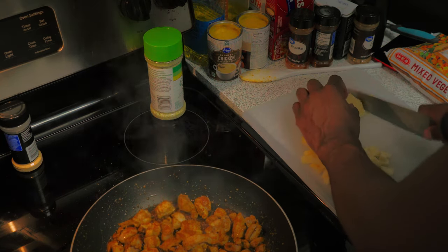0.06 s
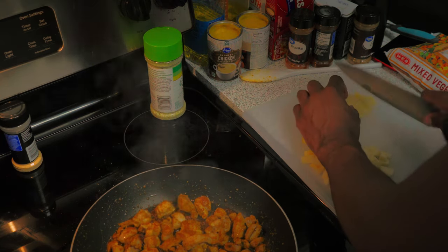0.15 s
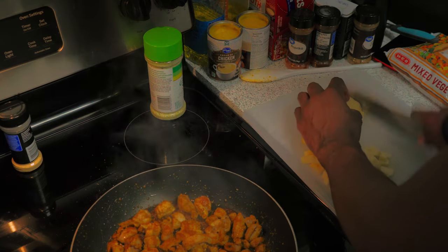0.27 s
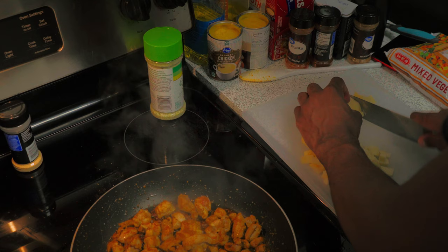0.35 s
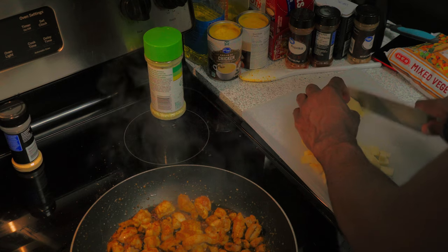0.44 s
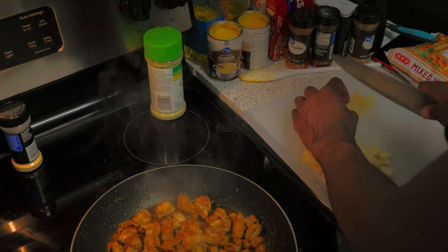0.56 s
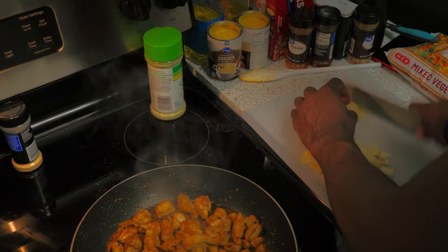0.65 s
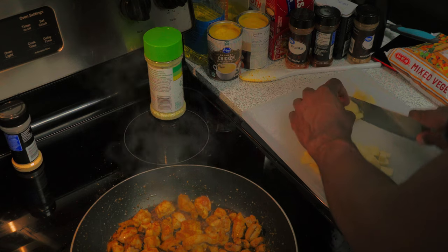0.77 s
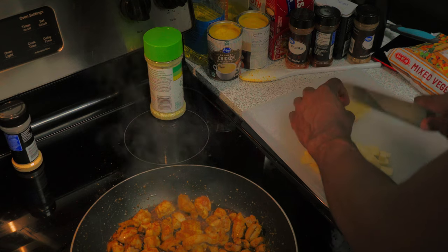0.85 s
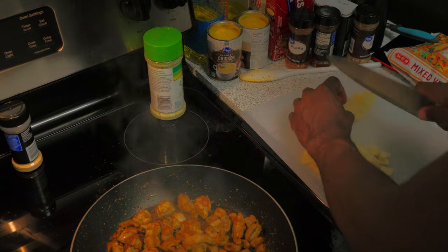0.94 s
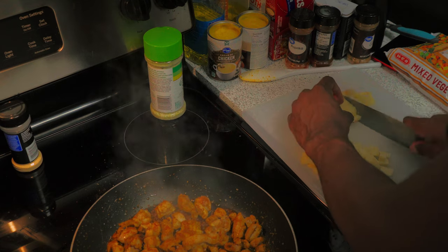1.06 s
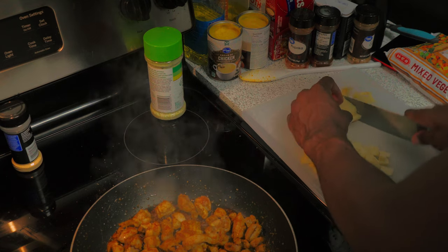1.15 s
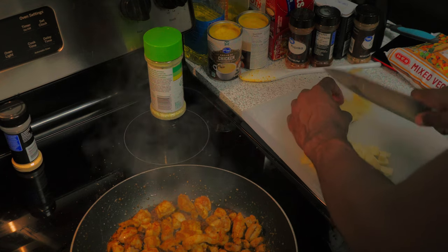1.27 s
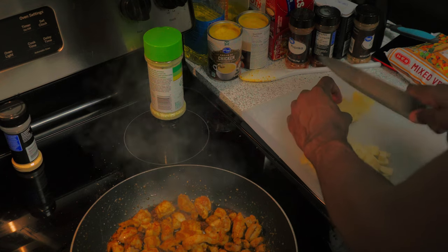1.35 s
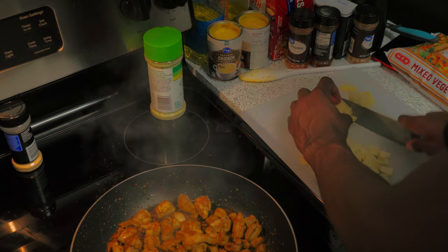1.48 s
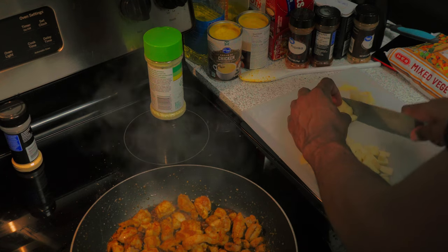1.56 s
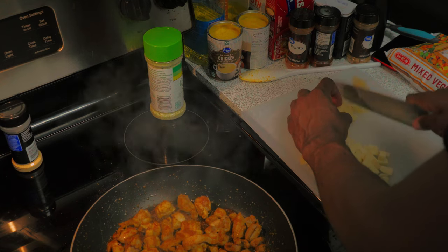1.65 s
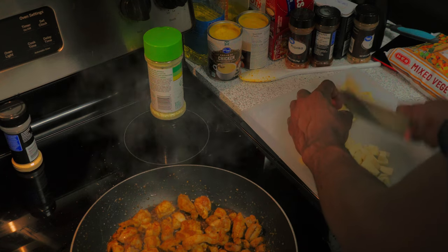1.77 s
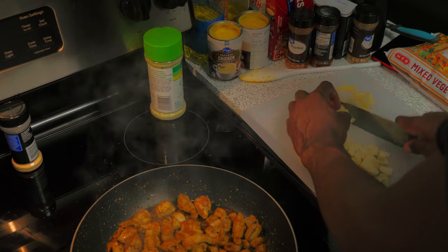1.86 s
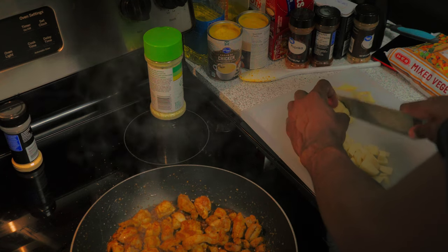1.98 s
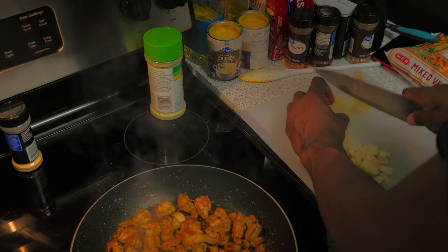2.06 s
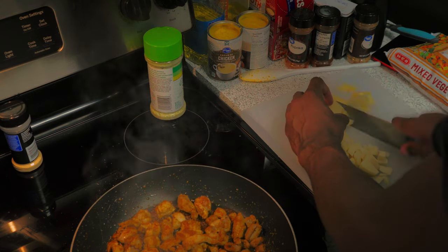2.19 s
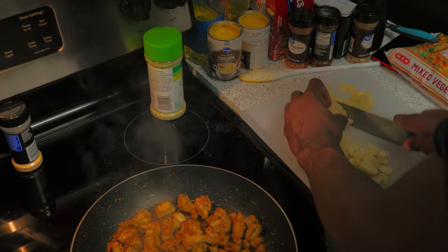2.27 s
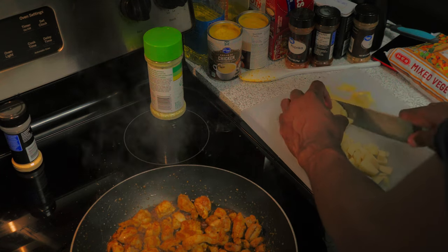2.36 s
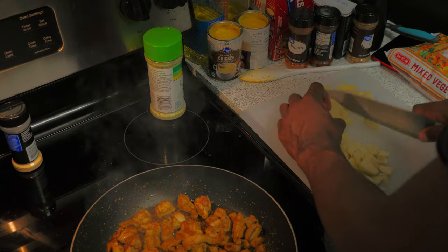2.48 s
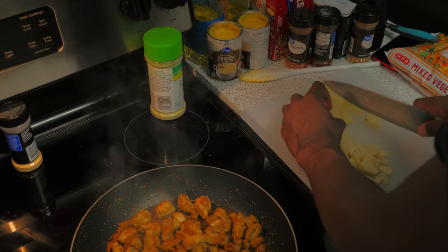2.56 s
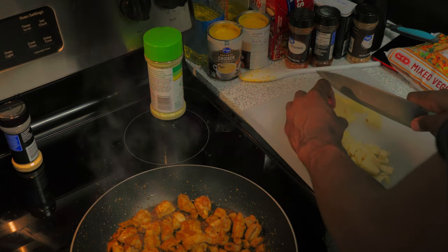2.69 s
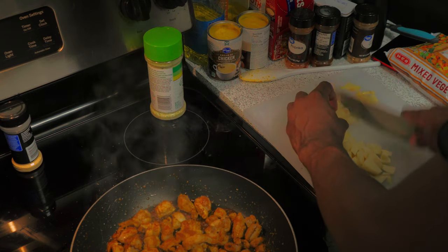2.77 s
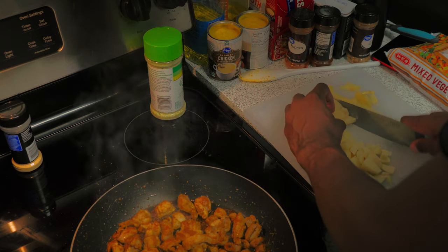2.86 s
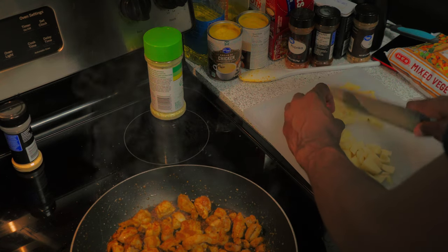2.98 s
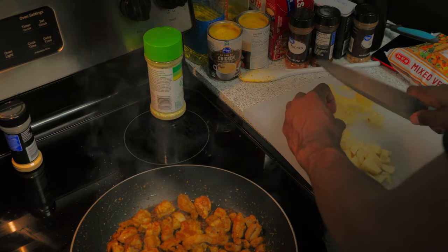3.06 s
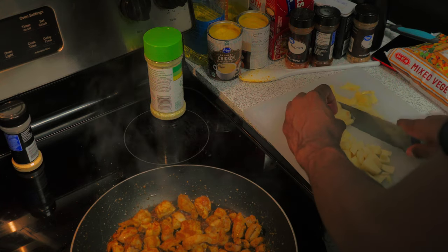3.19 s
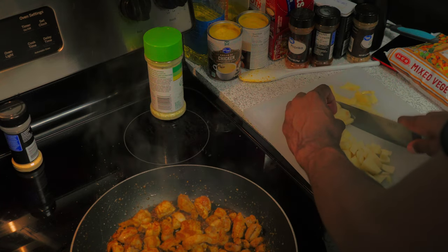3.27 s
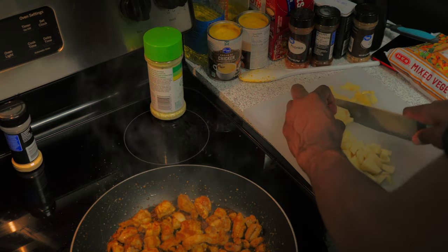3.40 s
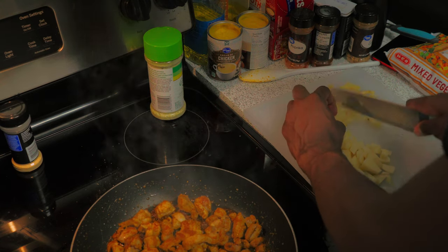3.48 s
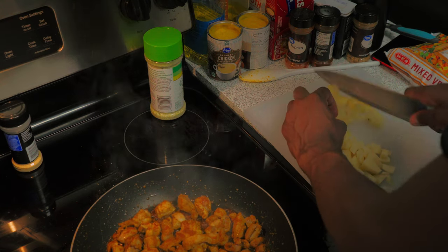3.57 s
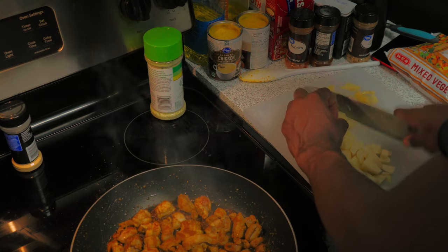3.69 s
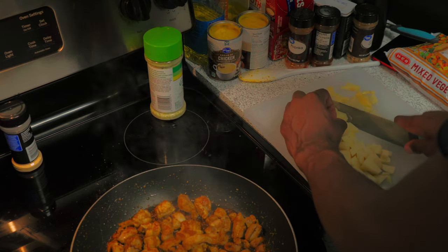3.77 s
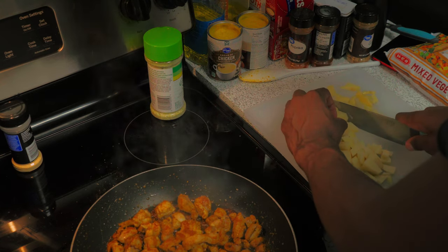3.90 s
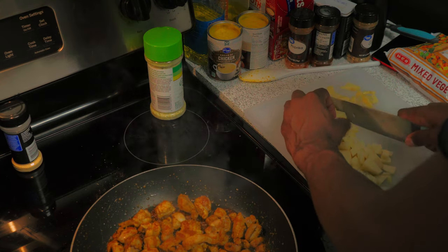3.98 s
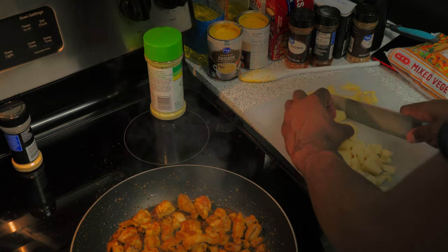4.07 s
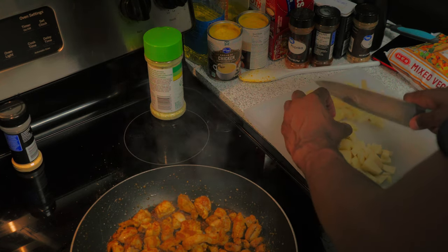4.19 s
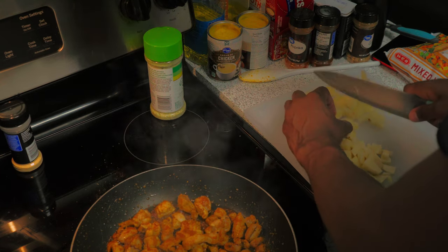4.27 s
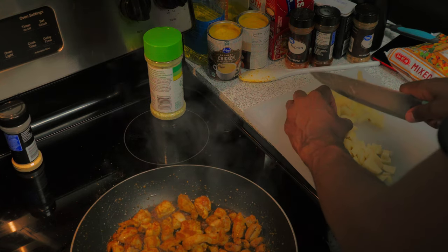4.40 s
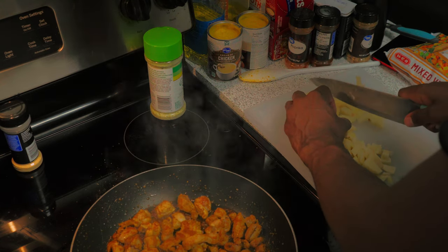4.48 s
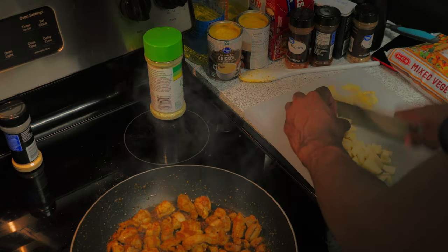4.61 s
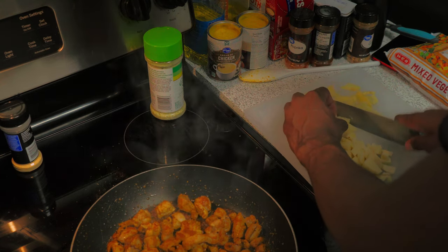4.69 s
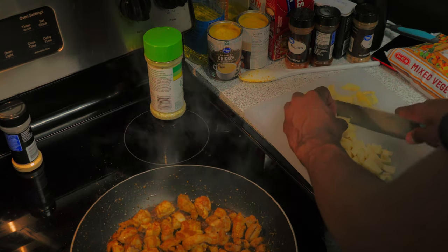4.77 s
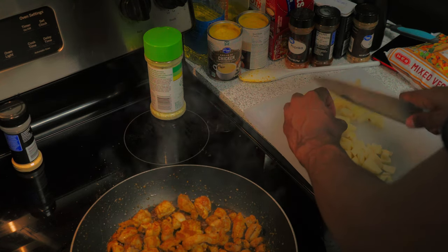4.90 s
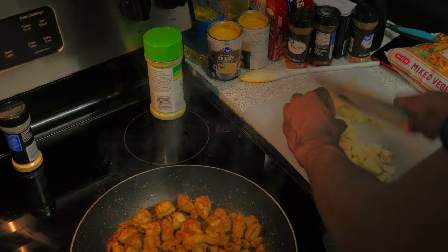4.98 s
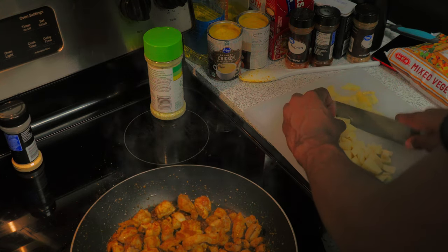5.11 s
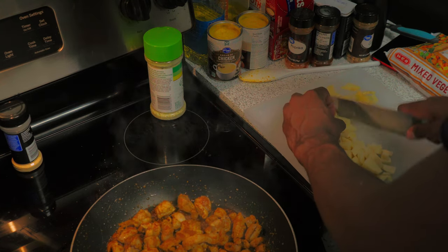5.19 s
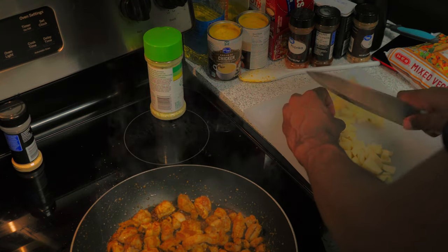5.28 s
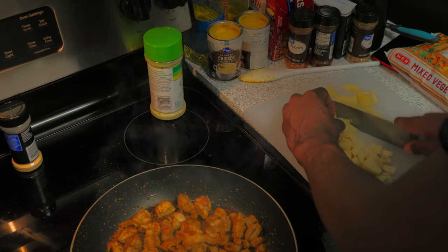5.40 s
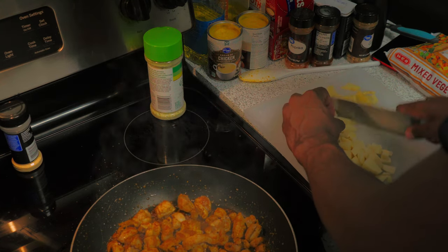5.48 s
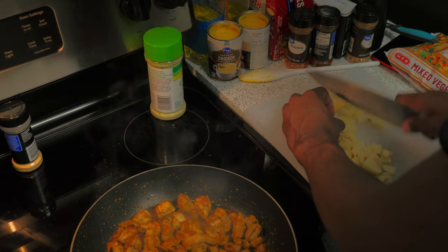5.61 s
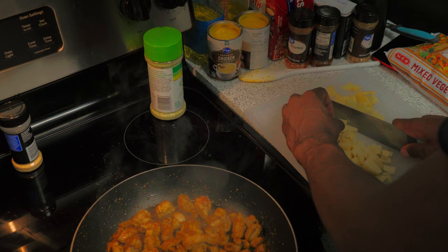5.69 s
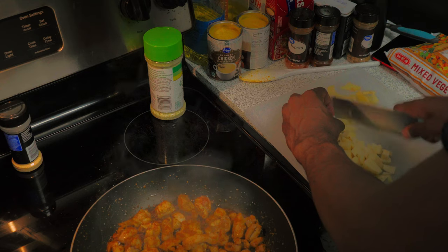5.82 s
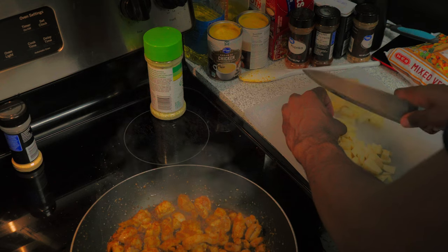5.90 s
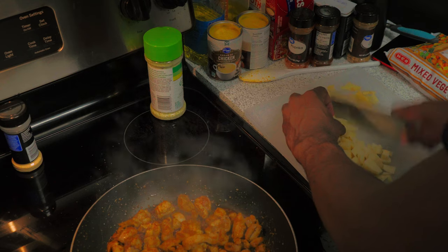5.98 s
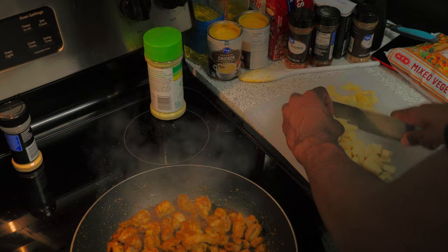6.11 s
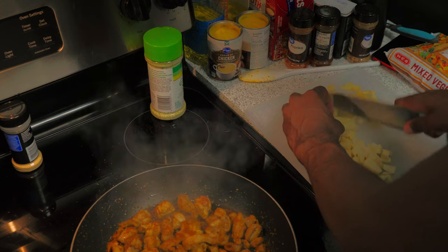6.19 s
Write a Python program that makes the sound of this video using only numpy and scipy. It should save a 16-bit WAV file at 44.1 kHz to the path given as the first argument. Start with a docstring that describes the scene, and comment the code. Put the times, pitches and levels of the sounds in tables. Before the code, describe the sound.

Close knife strokes crunch through potato and knock on a cutting board, over faint frying and a low appliance hum.

```python
"""A small, hard-walled kitchen, one microphone close to a plastic cutting board. A pan sizzles and an
appliance hums throughout. We come in on the ring of a hard chop; a chef's knife goes on through a potato,
each stroke a wet crunch, a sharp knock on the board, then the room's ring. Hard knocks clip, and the
limiter ducks and lets the room swell back. The pace slackens, and the steel clicks near 2.9 s. At 5.7 s
a stroke glances off with a scrape and a thump; one firm chop follows."""
import sys
import numpy as np
from scipy import signal
from scipy.fft import rfft, irfft, next_fast_len
from scipy.io import wavfile
from scipy.ndimage import uniform_filter1d, map_coordinates

SR = 44100
rng = np.random.default_rng(int(sys.argv[2]) if len(sys.argv) > 2 else 0)


def wrap_up_sound(samples):
    """Save the sound to the file named by the first command line argument, as 16-bit audio."""
    columns = np.atleast_2d(samples).T
    # keep every value between -1 and 1, then stretch to whole-number steps
    tamed = np.clip(columns, -1, 1)
    steps = np.round(tamed * 32767).astype(np.int16)
    wavfile.write(sys.argv[1], SR, steps)


N = 275625
T = np.arange(int(.8 * SR)) / SR  # seconds within one event


def amp(db):
    """Decibels to gain."""
    return 10 ** (np.asarray(db) / 20)


def unit(x):
    """x at rms 1."""
    return x / np.sqrt(np.mean(x ** 2) + 1e-20)


def along(points, hz):
    """(Hz, value) points read on a log frequency axis."""
    freqs, values = np.transpose(points)
    return np.interp(np.log(hz + 1), np.log(freqs), values)


def add(track, s, sound):
    """Mix a sound into the track at s seconds."""
    start = round(s * SR)
    part = sound[max(0, -start):max(0, N - start)]
    track[max(0, start):][:len(part)] += part


def noise(spectrum, size):
    """Noise of rms 1, shaped by (Hz, dB) points."""
    m = next_fast_len(size)
    gains = amp(along(spectrum, np.fft.rfftfreq(m, 1 / SR)))
    return unit(irfft(rfft(rng.standard_normal(m)) * gains, m)[:size])


def coloured(x, spectrum):
    """x through a minimum-phase filter with the given (Hz, dB) gains."""
    m = 2 * next_fast_len(len(x))
    cepstrum = irfft(np.log(amp(along(spectrum, np.fft.rfftfreq(m, 1 / SR)))), m)
    cepstrum[1:m // 2] *= 2
    cepstrum[m // 2 + 1:] = 0
    return irfft(rfft(x, m) * np.exp(rfft(cepstrum)), m)[:len(x)]


def wobble(rate):
    """A smooth random curve, rate knots a second."""
    knots = rng.standard_normal(int(N * rate / SR) + 4)
    return map_coordinates(knots, [np.arange(N) * rate / SR])


def fade(t60):
    """An exponential decay, 60 dB down after t60 seconds."""
    return np.exp(-np.log(1000) * T / t60)


def rise(attack):
    """A smooth onset with a time constant of attack seconds."""
    return 1 - np.exp(-T / attack)


def gate(length, attack, release):
    """Rise, hold until length seconds, die away."""
    return rise(attack) * np.exp(-np.maximum(T - length, 0) / release)


def ring(modes, scatter_db, loose=0):
    """Damped modes at new strengths on each strike; loose 0-1 scatters their phases."""
    out = np.zeros(len(T))
    for hz, db, t60 in modes:
        strength = amp(db + scatter_db * rng.standard_normal())
        out += strength * fade(t60) * np.sin(2 * np.pi * (hz * T + loose * rng.random()))
    return out


# The appliance's tones. Each row: frequency in Hz, level in dB.
HUM_TONES = [(118.4, -49), (242.2, -51), (479.1, -49.5), (511.4, -53), (742.9, -56)]
# The rumble under them. Each row: frequency in Hz, relative level in dB.
RUMBLE_SPECTRUM = [(15, 10.5), (27, 1), (42, -6), (80, -6), (120, -9), (160, -2), (240, 4.5), (350, -4.5),
                   (500, -4.5), (800, -18), (2500, -34)]
def appliance(rumble_db, tone_trim_db):
    """Far in the background, an appliance hums a little unsteadily over a soft rumble."""
    t = np.arange(N) / SR
    hum = np.zeros(N)
    for hz, db in HUM_TONES:
        level = amp(db + tone_trim_db + 3.1 * wobble(7.5))
        hum += level * np.sin(2 * np.pi * hz * t + wobble(4.8))
    return hum + amp(rumble_db) * noise(RUMBLE_SPECTRUM, N)


# Steam leaving the food. Each row: frequency in Hz, relative level in dB.
STEAM_SPECTRUM = [(200, -53), (800, 4), (2000, 5), (3500, 3.5), (5500, 4.5), (8000, -1.5), (12000, -5),
                  (16000, -9.5)]
def pan(hiss_db, crackle_db, pops_per_second, spread_db):
    """In the pan alongside, steam hisses and countless small bubbles burst in the fat."""
    hiss = amp(hiss_db + 0.35 * wobble(4.55)) * noise(STEAM_SPECTRUM, N)
    draws = rng.random((int(pops_per_second * N / SR), 3))
    when, pitch, faintness = draws.T[:, :, None]
    pop_samples = np.arange(128)
    cycles = 4500 * 3.3 ** pitch * pop_samples / SR
    strength = amp(-spread_db * np.log(faintness + 0.026))  # many faint, a few strong
    pops = strength * np.sin(2 * np.pi * cycles) * np.exp(-cycles / 2)
    positions = (when * N).astype(int) + pop_samples
    crackle = np.bincount(positions.ravel(), pops.ravel(), N)[:N]
    return hiss + amp(crackle_db) * unit(crackle)


def ticks(rows, t60, skirt_db):
    """Tiny bright snaps, each a noise burst around its own pitch."""
    out = np.zeros(N)
    for s, peak_db, hz in rows:
        band = [(hz / 4, 2 * skirt_db), (hz / 1.7, skirt_db), (hz, 0), (hz * 1.47, skirt_db)]
        burst = fade(t60) * noise(band, len(T))
        add(out, s, amp(peak_db) * burst / np.abs(burst).max())
    return out


# The loudest spits of fat. Each row: start in seconds, peak in dB, pitch in Hz.
LOUD_SPITS = [(.2605, -18.5, 7000), (.594, -18.5, 5000), (4.211, -27, 6200), (4.9052, -23, 5500),
              (4.9776, -25, 5900), (5.2115, -26, 5100), (5.71, -18, 4940)]
def spits(small_count, small_db, spread_db, small_hz):
    """Fat spits in the pan: a few loud snaps among small ones at random moments."""
    small = [(when * N / SR, small_db + spread_db * (2 * size - 1), small_hz * 2 ** (pitch - .5))
             for when, size, pitch in rng.random((small_count, 3))]
    return ticks(list(LOUD_SPITS) + small, t60=0.015, skirt_db=-16)


# What the hard walls send back. Each row: frequency in Hz, relative level in dB.
ROOM_SPECTRUM = [(30, -34), (60, -14), (100, 13.5), (145, -1.5), (230, 8), (480, -1), (720, -0.5),
                 (930, -1), (1300, -1.5), (2200, -5), (3600, -8.5), (6300, -17.5), (9500, -30.5),
                 (16000, -45)]
# How long the room holds it. Each row: frequency in Hz, t60 in seconds.
ROOM_T60 = [(80, 0.25), (300, 0.45), (1000, 0.65), (3000, 0.63), (7000, 0.72), (15000, 0.51)]
def room_tail(build_s):
    """The kitchen's diffuse answer: it builds up, then each frequency dies at its own speed."""
    hz, t, bands = signal.stft(noise(ROOM_SPECTRUM, len(T)), SR, nperseg=256)
    decay = amp(-60 * t / along(ROOM_T60, hz)[:, None])
    tail = signal.istft(bands * decay, SR)[1][:len(T)]
    return tail * rise(build_s)


# Modes of board, blade, and counter with kitchen. Each row: frequency in Hz, level in dB, t60 in seconds.
BOARD_MODES = [(230, -17.5, 0.068), (949, -1.5, 0.019), (1055, -3, 0.017), (1346, 0, 0.013)]
BLADE_MODES = [(2664, -8.5, 0.027), (3410, -15, 0.038)]
COUNTER_MODES = [(81, -3, .28), (103, 5, .28), (183, -3, .28), (226, 3, .3), (250, 4.5, .33), (488, -3, .4),
                 (631, -1, .44), (781, -3, .42), (836, -4, .42), (902, 4, .47), (928, 4.5, .5),
                 (976, -1, .48), (1055, 2.5, .48), (1138, -2, .48), (1351, -2.5, .45), (1492, -3.5, .45),
                 (1643, -7, .45), (1815, -7.5, .45), (2790, -7, .45)]
# The crack of steel on plastic. Each row: frequency in Hz, relative level in dB.
CRACK_SPECTRUM = [(40, -46), (300, -9), (1200, 6.5), (4000, -5), (7000, -13), (15000, -34)]
def blow(knock_db, clack_db, crack_db, room_db, counter_db):
    """Blade meets board: a short knock, clack and crack up close, then counter and room ring."""
    board = ring(BOARD_MODES, scatter_db=2)
    blade = amp(clack_db) * ring(BLADE_MODES, scatter_db=3)
    crack = amp(crack_db) * fade(0.029) * noise(CRACK_SPECTRUM, len(T))
    counter = amp(counter_db) * ring(COUNTER_MODES, scatter_db=0.6, loose=0.98) * rise(0.0057)
    room = amp(room_db) * room_tail(build_s=0.0064)
    wall_swell = amp(2.54 * np.exp(-((T - .04) / 0.033) ** 2))  # the first echoes arrive in a bunch
    return amp(knock_db) * (board + blade) + crack + wall_swell * (counter + room)


# The tone of a light touch. Each row: frequency in Hz, gain in dB.
TAP_GAINS = [(40, -7), (150, 7), (300, 2.5), (850, 2), (1100, 8), (1450, 1.5), (6000, 10)]
def tap():
    """A soft contact sounds the same board, with little crack."""
    touch = blow(knock_db=-3, clack_db=-6.5, crack_db=-18, room_db=-11.5, counter_db=-30)
    return coloured(touch, TAP_GAINS)


# The blade's early touches. Each row: start in seconds, force in dB.
EARLY_TAPS = [(.3436, -17.5), (.727, -20.5), (1.502, -17), (1.862, -18), (2.2459, -18), (2.8706, -9),
              (3.261, -13.5), (3.796, -22.5), (5.0843, -18.5), (6.07, -9.5)]
def taps():
    """The blade touches the board lightly just before it comes fully down."""
    out = np.zeros(N)
    for s, force_db in EARLY_TAPS:
        add(out, s, amp(force_db) * tap())
    return out


# The click of the steel. Each row: start in seconds, peak in dB, pitch in Hz.
EDGE_CLICKS = [(2.8703, -1, 6400)]
def edge_click():
    """The steel edge clicks once, close and bright."""
    return ticks(EDGE_CLICKS, t60=0.022, skirt_db=-21)


def bump(hz, t60, attack):
    """A few slow cycles of the whole board on the counter."""
    return fade(t60) * rise(attack) * np.sin(2 * np.pi * hz * T)


# What the dragging edge rings. Each row: frequency in Hz, level in dB, t60 in seconds.
SCRAPE_MODES = [(1070, -2, 0.011), (2910, -5.5, 0.0087), (3430, -7, 0.014), (4800, -11, 0.006)]
def drag(length_s, slips_per_second, fade_db_per_s, room_db):
    """The edge sticks and slips ever more lightly; each slip rings the board and the room."""
    slips = (rng.random(len(T)) < slips_per_second / SR) * rng.standard_normal(len(T))
    rub = unit(signal.fftconvolve(slips, ring(SCRAPE_MODES, scatter_db=5))[:len(T)])
    rub *= amp(-fade_db_per_s * T) * gate(length_s, attack=.003, release=.006)
    tail = room_tail(build_s=0.0055)
    room = signal.fftconvolve(rub, tail / np.linalg.norm(tail))[:len(T)]
    return rub + amp(room_db) * room


def glance(land_s, thump_s):
    """One stroke glances off: it lands softly, the edge drags, and the board thumps."""
    out = np.zeros(N)
    add(out, land_s, amp(-19) * tap())
    scrape = drag(length_s=0.133, slips_per_second=970, fade_db_per_s=74, room_db=-14)
    add(out, land_s, amp(-26.5) * scrape)
    add(out, thump_s, amp(-10.5) * bump(hz=127, t60=0.1, attack=0.0033))
    return out


# The potato's crunch and the blade's low push. Each row: frequency in Hz, relative level in dB.
CRUNCH_SPECTRUM = [(40, -50), (200, -17), (1000, 20.5), (3000, 9.5), (6500, 11), (12000, 6), (16000, 9)]
PUSH_SPECTRUM = [(30, -32), (60, -16), (90, 4), (190, 5), (400, -10), (1000, -7), (2500, -53), (8000, -70)]
def cut(force_db, cut_s, fullness, crunch_db, swell_db=5, grain_db=3):
    """Potato cells burst in a grainy hiss that grows as the blade sinks; its push shakes the board."""
    depth = np.minimum(T / cut_s, 1)
    flicker = unit(uniform_filter1d(rng.standard_normal(len(T)), size=40))
    grain = unit(amp(grain_db * flicker))
    crunch = amp(crunch_db + swell_db * (depth - 1.5)) * grain * noise(CRUNCH_SPECTRUM, len(T))
    push = amp(-28.5 + 0.47 * force_db) * noise(PUSH_SPECTRUM, len(T))
    # a hard bite into a full slice bumps the board on the counter
    bite = amp(-25 + 1.2 * force_db) * fullness * bump(hz=173, t60=0.093, attack=.003)
    return gate(cut_s + 0.0019, attack=0.0022, release=0.0017) * (crunch + push) + bite


def chop(force_db, fullness, ring_db, ring_hz, ring_width=0.22):
    """The knife hits the board: harder is brighter and leaner, and where it lands sets the ring."""
    thud_db = -1.75 - 0.38 * force_db  # the bass grows more slowly than the force
    snap_db = 7.5 - 8 * fullness  # potato under the edge cushions the snap
    bright_db = 1 + 0.64 * min(force_db, 0)  # soft blows lose treble
    bass = [(35, thud_db - 11), (90, thud_db), (250, thud_db), (400, 0)]
    board = [(ring_hz / (1 + ring_width), 0), (ring_hz, ring_db), (ring_hz * (1 + ring_width), 0)]
    edge = [(2200, 0), (2800, snap_db), (3800, snap_db + 1), (5500, bright_db)]
    knock = blow(knock_db=4, clack_db=snap_db, crack_db=3.5, room_db=-10.5, counter_db=-24.5)
    return amp(force_db) * coloured(knock, bass + board + edge)


# The knife strokes. Each row: landing time in seconds, force in dB, length of the cut before it in
# seconds, crunch level in dB, gain of the board's ring in dB, its pitch in Hz.
KNIFE_STROKES = [(-.035, 8, 0.02, -23, 8.5, 875), (.3632, 1.5, 0.021, -22, 8.5, 1020),
                 (0.7613, 1.5, 0.042, -27.5, 6.5, 1050), (1.1377, 2, 0.044, -23, 6.5, 1130),
                 (1.5084, -0.5, 0.039, -22.5, 3.5, 980), (1.8763, 1, 0.028, -21.5, 4.5, 864),
                 (2.258, 0, 0.028, -24, 1.5, 890), (2.8745, -2, 0.018, -15, -1, 940),
                 (3.2664, -0.5, .025, -24.5, 0.5, 1060), (3.8196, -2.5, .06, -27, 4, 1130),
                 (4.6947, -7, 0.014, -19.5, 1.5, 1000), (5.0924, -5.5, 0.011, -20.5, 4.5, 830),
                 (5.4208, -5.5, 0.012, -17, 3, 834), (6.0748, 2, 0.0075, -31, 4.5, 870)]
def strokes(full_cut_s):
    """Right at the microphone, each stroke cuts through the potato, then strikes the board."""
    out = np.zeros(N)
    for s, force_db, cut_s, crunch_db, ring_db, ring_hz in KNIFE_STROKES:
        fullness = min(cut_s / full_cut_s, 1)
        add(out, s - cut_s, cut(force_db, cut_s, fullness, crunch_db))
        add(out, s, chop(force_db, fullness, ring_db, ring_hz))
    return out


def scene():
    """Hum behind, pan alongside and knife in front, all at one microphone."""
    hum = appliance(rumble_db=-39.5, tone_trim_db=-0.5)
    frying = pan(hiss_db=-38.5, crackle_db=-48, pops_per_second=290, spread_db=3)
    frying += spits(small_count=16, small_db=-37, spread_db=7, small_hz=9000)
    knife = taps() + edge_click() + glance(land_s=5.724, thump_s=5.775) + strokes(full_cut_s=0.027)
    return (hum + frying + knife)[None]


def limiter(x, threshold_db, attack_s, release_db_per_s, start_db):
    """The gain drops just after each overload and creeps back; it begins start_db down."""
    over_db = np.maximum(20 * np.log10(np.abs(x) + 1e-9) - threshold_db, 0)
    ramp_db = release_db_per_s * np.arange(N) / SR
    held_db = np.maximum.accumulate(np.maximum(over_db + ramp_db, start_db), axis=-1) - ramp_db
    pole = np.exp(-1 / (attack_s * SR))
    duck_db = start_db + signal.lfilter([1 - pole], [1, -pole], held_db - start_db)
    return x * amp(-duck_db)


def record(dry):
    """The close knocks overload the recorder: it ducks and clips, then trims deep bass and top treble."""
    ducked = limiter(dry, threshold_db=4.5, attack_s=0.0011, release_db_per_s=175, start_db=12.5)
    clipped = np.clip(ducked, -1, 1)
    m = next_fast_len(N + SR // 2)
    hz = np.fft.rfftfreq(m, 1 / SR)
    passband = hz / np.hypot(hz, 30) * (hz < 15800)
    return irfft(rfft(clipped, m) * passband, m)[..., :N]


dry = scene()
out = record(dry)
wrap_up_sound(out)
```